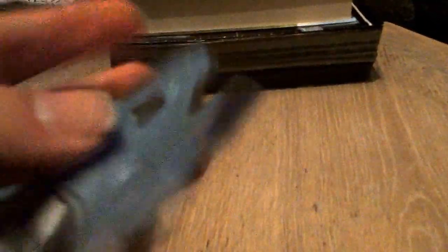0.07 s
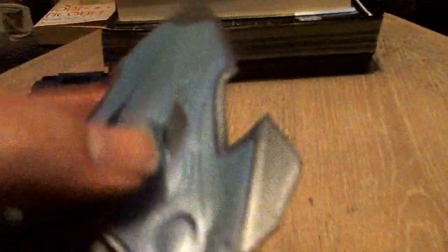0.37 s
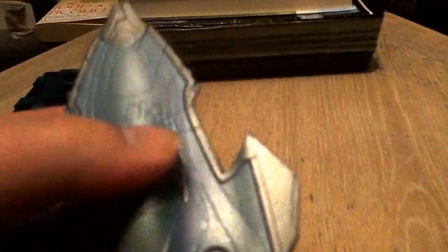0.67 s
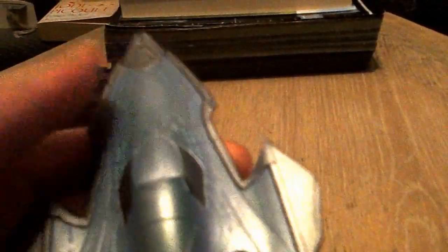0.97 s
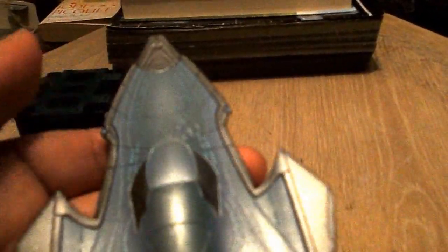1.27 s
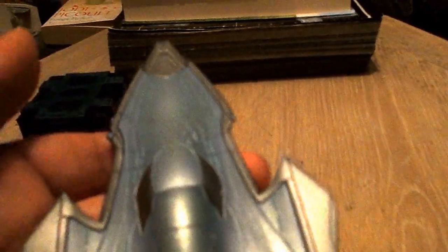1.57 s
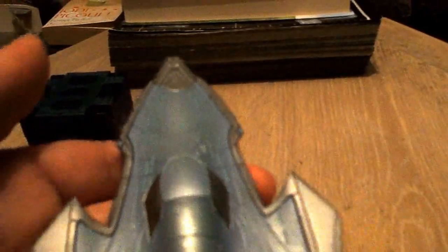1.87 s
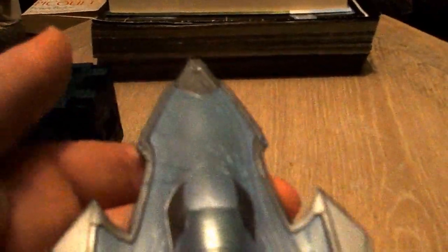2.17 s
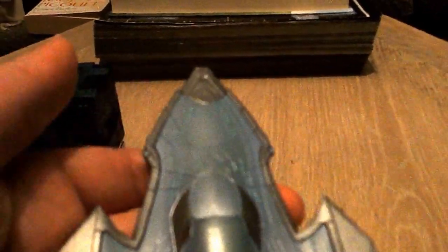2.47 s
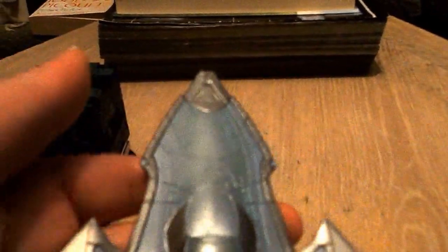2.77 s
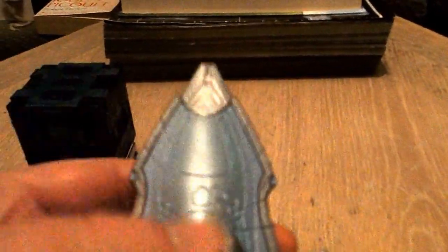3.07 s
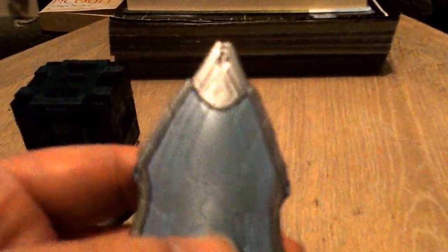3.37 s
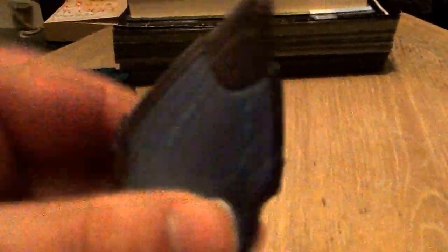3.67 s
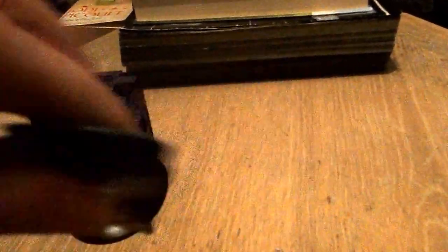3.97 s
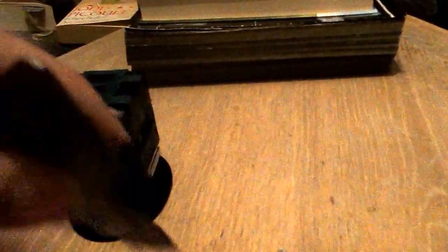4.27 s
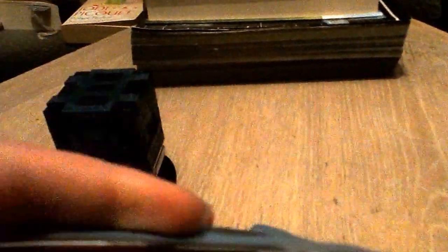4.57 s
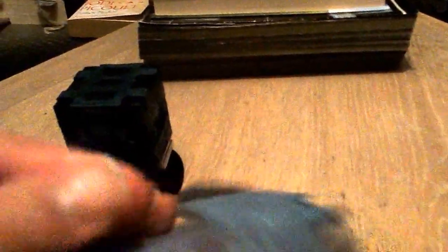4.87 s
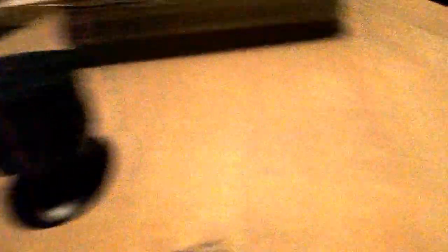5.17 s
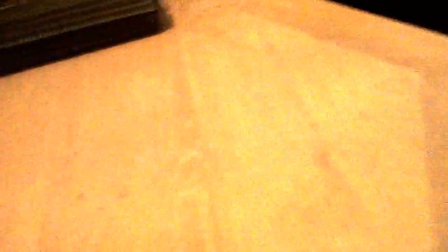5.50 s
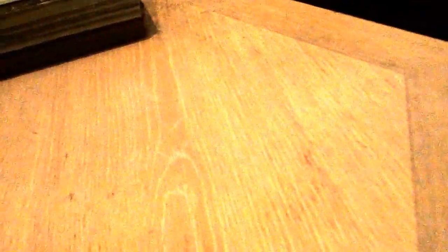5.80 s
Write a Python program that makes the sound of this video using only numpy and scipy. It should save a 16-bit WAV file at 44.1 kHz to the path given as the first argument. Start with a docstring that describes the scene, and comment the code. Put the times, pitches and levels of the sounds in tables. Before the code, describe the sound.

In a quiet room, a close microphone picks up the soft brushing of skin on a metal toy. A lull follows, then more rubbing and several light clicks against a plastic stand. Suddenly the toy falls and bounces rapidly on a wooden tabletop, each bright clack carrying a woody knock and a short ring, the loudest slightly clipped. It settles within a second, followed by faint low knocks.

```python
"""A die-cast metal model topples onto a wooden table and bounces to rest. Each impact excites the
normal modes of both bodies: a hard clack, a thud of the tabletop and a brief metallic ring.
Before the fall it is turned in the hand, where friction hisses over the casting, and is clicked
onto its plastic stand. A small, close microphone in a quiet room limits and clips the loudest blows."""
import sys
import numpy as np
from scipy import signal
from scipy.fft import rfft, irfft
from scipy.io import wavfile
from scipy.ndimage import uniform_filter1d

SR = 44100
rng = np.random.default_rng(int(sys.argv[2]) if len(sys.argv) > 2 else 0)


def transcribe(u):
    """Save the signal u as a 16-bit wav file named by the first command-line argument.

    u: samples, shape (n,) or (channels, n), limited to [-1, 1]; the rate is SR.
    q: integer samples, one column per channel.
    """
    v = np.clip(np.atleast_2d(u).T, -1, 1)
    q = np.round(v * 32767).astype(np.int16)
    wavfile.write(sys.argv[1], SR, q)


N = 266231
TIME = np.arange(N) / SR
AGE = TIME[:int(.7 * SR)]   # time since an impact, s

# impacts on the table: t/s, clack level/dB, clack f/Hz, thud level/dB
TABLE_IMPACTS = [(5.1002, -1, 2480, -2), (5.1502, 8.5, 5260, -10), (5.172, -20, 5840, -9),
                 (5.2105, -10, 6400, -14), (5.219, -14.5, 6200, -15), (5.2872, -10.5, 4700, -4.5),
                 (5.326, -9.5, 4650, -6.5), (5.3741, 0, 3870, -14), (5.3841, 8.5, 5300, -15),
                 (5.4198, 5.5, 4730, -13), (5.4432, -4.5, 5500, -24), (5.4745, 5.5, 3200, -14),
                 (5.526, -.5, 5330, -7), (5.5465, -6, 2940, -0.5), (5.5785, -16.5, 2560, -4),
                 (5.5995, -2.5, 6000, -11), (5.6226, -21, 2420, -.5), (5.641, -6, 2400, -3),
                 (5.6455, -2, 3400, -4.5), (5.6858, -4, 6000, -2), (5.836, -12, 3600, -16)]
# normal modes of the casting and of the tabletop: f/Hz, level/dB, relative decay time
CASTING_MODES = [(1748, -5, 1.2), (2435, 2, .9), (2660, -6, .8), (2995, -1, .8), (3160, -9, .7),
                 (3392, -2, .8), (3505, -6, .7), (3785, -10, .7), (4430, -4, .6), (4750, -5, .6),
                 (4960, -6, .6), (5280, -3, .9), (5540, -2, .6), (5750, -8, .5), (6016, -3, .8),
                 (6160, -6, .7), (6480, -4, .6), (6850, -8, .6), (7226, -4, .6), (8240, -9, .6),
                 (8670, -7, .7), (9400, -12, .5)]
TABLETOP_MODES = [(119, -13, 0.58), (168.6, -7, 1.1), (224.2, 0.5, 1.6), (246.7, -3, 1.2),
                  (288.4, -1, 0.81), (341, -14, .8), (379.5, -7.5, 1.47), (525, -1, 1.2),
                  (580.4, 4.5, 0.67), (629.5, -1, 0.54), (764, 2.5, 0.35), (795, -1.5, 0.43),
                  (1064, 1.5, 1.2), (1080, -2.5, 0.86), (1268, -12, 0.4)]
# spectrum of the knock on wood: f/Hz, spectral level/dB
KNOCK_SPECTRUM = [(100, -39), (200, -6), (560, 5), (1100, 1), (1500, -11), (2500, -4), (5000, -30)]
# the casting's ring, long while it tumbles, short once flat: t/s, T60/s, level/dB for a 0 dB blow
RING_DECAYS = [(5.1, 0.2, -12.5), (5.33, 0.19, -12.5), (5.41, .05, -25), (5.476, .09, -2), (5.58, .1, -9.5),
               (5.72, 0.098, -17.5), (5.84, .07, -8.5)]
# low ringing tones of the casting and tabletop: from t/s, until t/s, f/Hz, level/dB for a 0 dB blow
LOW_TONES = [(4.94, 5.046, 1762, -40), (5.05, 5.373, 1749, -24), (5.05, 5.308, 965, -31.5),
             (5.305, 5.565, 961, -14), (5.46, 5.746, 1734, -31), (5.52, 5.72, 1295, -27),
             (5.56, 5.77, 970, -17.5), (5.61, 5.765, 1140, -22)]
# the held model striking its stand: t/s, level/dB, f/Hz
STAND_IMPACTS = [(3.2023, -40, 3120), (3.219, -39.5, 3100), (4.0522, -11, 2960), (4.098, -28, 2940),
                 (4.4051, -5, 3250), (4.5320, -2, 3395), (4.9542, -18, 6240), (4.988, -7, 6470),
                 (5.003, -19.5, 6000)]
# finger strokes: start t/s, end t/s, level/dB, hiss f/Hz
STROKES = [(.006, 0.073, -41, 6000), (0.069, 0.179, -35.5, 9800), (0.181, .208, -44, 7000),
           (.27, 0.402, -55, 7100), (0.418, 0.506, -49.5, 7100), (0.494, .575, -40, 6960),
           (.55, .68, -42, 6940), (0.644, 0.786, -39, 6400), (0.771, 0.944, -43, 6200),
           (3.392, 3.526, -50, 4970), (3.547, 3.702, -52.5, 5670), (3.665, 3.75, -41, 5400),
           (3.7, 3.808, -37, 5900), (3.809, 3.875, -37, 6400), (3.948, 3.991, -42, 6500),
           (4.044, 4.133, -39.5, 7740), (4.405, 4.677, -44.5, 5500), (4.462, 4.579, -35.5, 6500),
           (4.688, 4.711, -42.5, 6300), (4.753, 4.808, -33.5, 6550), (4.849, 4.96, -36.5, 5600),
           (4.921, 5.028, -32, 6700)]
# skin sliding on metal: f/Hz, spectral level/dB
FRICTION_SPECTRUM = [(710, -71), (1200, -17), (1720, -5.5), (1960, -33), (2430, -9), (3330, -8.5),
                     (4080, -10), (4520, -8.5), (5490, -9.5), (6310, -4.5), (7590, -5), (9750, -5),
                     (11000, -14), (14300, -59), (22000, -120)]
# soft bumps and ticks of handling, then low knocks of the table after the fall: t/s, level/dB, f/Hz, T60/s
SOFT_IMPACTS = [(1.493, -43.5, 2500, 0.013), (2.926, -50.5, 350, 0.12), (3.457, -45, 242, .21),
                (3.464, -53, 832, 0.63), (5.893, -33.5, 407, 0.26), (6.017, -34, 573, .24),
                (6.034, -43, 1200, .11)]
# hollow resonances dying away at the start: f/Hz, level/dB
HOLLOW_RESONANCES = [(250, -59), (518, -50.5), (874, -54), (1642, -51.5)]
# reverberation time of the room: f/Hz, T60/s
REVERBERATION = [(100, 0.56), (400, 0.58), (2000, 0.32), (6000, 0.32), (11000, 0.29)]
# room tone and hiss: f/Hz, spectral level/dB
BACKGROUND_SPECTRUM = [(15, -54), (25, -24.5), (169, -4.5), (241, -2), (336, -4), (372, -5), (468, -4.5),
                       (603, -8.5), (651, -8), (1760, -12), (5390, -13), (7700, -11.5), (8530, -10.5),
                       (11000, -15.5), (14300, -78), (22000, -120)]


def fall(ring_db_per_db=.52, ring_pitch_ratio=1.2, top_hz=9500):
    """Impact excitation: each bounce clacks, thumps the board and leaves the casting ringing."""
    out = np.zeros(N)
    times, t60s, levels = np.transpose(RING_DECAYS)
    for s, clack_db, hz, thud_db in contacts():
        strike = clack(hz, width_hz=4300, t60=.028, bright_db=-27, low_hz=1430,
                       metal_db=-1.5, metal_t60=.06, focus_db=7)
        add(out, s, from_db(clack_db) * strike)
        add(out, s, from_db(thud_db) * thud())
        ring_db = np.interp(s, times, levels) + ring_db_per_db * blow_db(clack_db, thud_db)
        after_ring = ring(CASTING_MODES, np.interp(s, times, t60s), ring_pitch_ratio * hz, focus_db=6)
        add(out, s, from_db(ring_db) * after_ring)
    return cut(out, top_hz, "low")


def contacts(settle_s=5.7085, gap_s=.0108, count=5, loss_db=.65, clack_db=-24.5, hz=2900, thud_db=-12.5):
    """Inelastic collisions: the bounces, plus a run of ever weaker contacts as the model rocks to rest."""
    rocking = [(settle_s + k * gap_s, clack_db - k * loss_db, hz, thud_db - k * loss_db)
               for k in range(count)]
    return TABLE_IMPACTS + rocking


def blow_db(clack_db, thud_db):
    """Incoherent addition: the powers of clack and thud sum to the level of the blow."""
    return 20 * np.log10(np.hypot(from_db(clack_db), from_db(thud_db)))


def clack(hz, width_hz, t60, bright_db, low_hz, metal_db, metal_t60, focus_db):
    """A brief contact has a broad spectrum: a crack, and a clink of modes damped by the contact."""
    white = rng.standard_normal(len(AGE))
    band = resonate(white, hz, width_hz) + from_db(bright_db) * white
    crack = burst(cut(band, low_hz, "high"), fade(t60))
    clink = ring(CASTING_MODES, metal_t60, hz, focus_db)
    return (crack + from_db(metal_db) * clink) / np.hypot(1, from_db(metal_db))


def ring(modes, t60, favoured_hz, focus_db):
    """Modal superposition: damped sines, weighted by -focus_db per octave away from favoured_hz."""
    hz, db, decay_ratios = np.transpose(modes)
    scatter_db = 4.5 * rng.standard_normal(len(hz))
    octaves_away = np.abs(np.log2(hz / favoured_hz))
    gains = from_db(db + scatter_db - focus_db * octaves_away) * rng.choice([-1, 1], len(hz))
    gains = gains / np.linalg.norm(gains)
    hz = hz * (1 + .002 * rng.standard_normal(len(hz)))   # each contact loads the body differently
    return sum(gain * np.sin(2 * np.pi * f * AGE) * fade(t60 * ratio)
               for gain, f, ratio in zip(gains, hz, decay_ratios))


def thud(knock_t60=.023, board_db=-9, board_t60=.2, low_hz=135):
    """A struck plate: the wood gives a dull knock, then vibrates freely in its modes."""
    knock = burst(noise(KNOCK_SPECTRUM, len(AGE)), fade(knock_t60))
    board = ring(TABLETOP_MODES, board_t60, favoured_hz=600, focus_db=3)
    return cut(knock + from_db(board_db) * board, low_hz, "high", order=4)


def low_ringing(db_per_db=.27, detune_share=.014):
    """Free vibration: each contact restarts low tones of the casting and tabletop, slightly detuned."""
    blows = [(s, db) for s, db, _ in STAND_IMPACTS]
    blows += [(s, blow_db(clack_db, thud_db)) for s, clack_db, _, thud_db in contacts()]
    blows.sort()
    gaps = np.diff([s for s, _ in blows], append=N / SR)
    detunes = 1 + detune_share * rng.uniform(-.89, 1, len(blows))
    out = np.zeros(N)
    for start, until, hz, level_db in LOW_TONES:
        for (s, db), gap_s, detune in zip(blows, gaps, detunes):
            if start <= s < until:
                tone = stopped_tone(hz * detune, min(gap_s, until - s))
                add(out, s, from_db(level_db + db_per_db * db) * tone)
    return out


def stopped_tone(hz, free_s, t60=.59, damp_s=.0036):
    """Contact damping: one mode decays freely for free_s, then is quickly stopped."""
    gate = np.clip(1 + (free_s - AGE) / damp_s, 0, 1)
    return np.sin(2 * np.pi * hz * AGE) * fade(t60) * gate


def stand_clicks(peg_db=-7, ring_db=-23, db_per_db=.56, stand_db=-19.5, stand_hz=1050, grip_hz=2400):
    """An impact excites both bodies: metal ticks and rings, the peg pings, the hollow stand knocks."""
    metal, plastic = np.zeros((2, N))
    for s, db, hz in STAND_IMPACTS:
        tick = clack(hz, width_hz=560, t60=.008, bright_db=-10, low_hz=1420,
                     metal_db=-5.5, metal_t60=.034, focus_db=-4.5)
        ping = np.sin(2 * np.pi * hz * AGE) * fade(t60=.028)
        add(metal, s, from_db(db) * (tick + from_db(peg_db) * ping))
        drive_db = db_per_db * db
        held_ring = ring(CASTING_MODES, t60=.13, favoured_hz=hz, focus_db=.5)
        add(metal, s, from_db(ring_db + drive_db) * held_ring)
        knock_db = stand_db + drive_db - 9 * np.log2(hz / stand_hz)   # higher clicks excite it less
        add(plastic, s, from_db(knock_db) * dull_ring(stand_hz, width_hz=330, t60=.052))
    return cut(metal, grip_hz, "high", order=4) + plastic   # the grip damps the low modes


def fingers(grain_db=1, modes_db=-6, peak_db=-5.5, skew=.92, roundness=.76, edge_share=.24):
    """Sliding friction: skin slips over the metal in tiny grains, which hiss and excite its modes."""
    grains = from_db(grain_db * rms_one(uniform_filter1d(rng.standard_normal(N), size=90)))
    friction = noise(FRICTION_SPECTRUM, N) * grains
    body = sum(from_db(db) * resonate(friction, hz, width_hz=70) for hz, db, _ in CASTING_MODES)
    friction = friction + from_db(modes_db) * rms_one(body)
    friction = cut(friction, 2070, "high", order=3)   # the grip damps the low modes
    out = np.zeros(N)
    for start, end, db, hz in STROKES:
        progress = np.clip((TIME - start) / (end - start), 0, 1)
        pressure = np.abs(np.sin(np.pi * progress ** skew)) ** roundness   # one arch, cresting early
        hiss = cut(friction, edge_share * hz, "high")   # a higher stroke is also thinner
        peak = rms_one(resonate(hiss, hz, width_hz=1300))
        out += from_db(db) * pressure * rms_one(hiss + from_db(peak_db) * peak)
    return out


def squeak(at_s=.165, half_width_s=.018, hz=5160, db=-45.5):
    """Stick-slip motion: a fingertip sounds a narrow band for an instant."""
    swell = np.exp(-((TIME - at_s) / half_width_s) ** 2)
    return from_db(db) * swell * rms_one(resonate(rng.standard_normal(N), hz, width_hz=70))


def bumps(time_bandwidth=42):
    """Soft contacts excite one resonance each; its bandwidth varies inversely with its decay time."""
    out = np.zeros(N)
    for s, db, hz, t60 in SOFT_IMPACTS:
        add(out, s, from_db(db) * dull_ring(hz, time_bandwidth / t60, t60))
    return out


def hollow_ring(t60=1.0, width_share=.11):
    """Free decay: a few broad resonances, already sounding at the start, fade away."""
    out = np.zeros(N)
    for hz, db in HOLLOW_RESONANCES:
        add(out, 0, from_db(db) * dull_ring(hz, width_share * hz, t60))
    return out


def room(x, wet_db, build_s=.0022):
    """Reverberation: direct sound plus a diffuse tail whose treble is absorbed first."""
    edges_hz = np.geomspace(60, 12000, num=9)
    tail = np.zeros(len(AGE))
    for low, high in zip(edges_hz, edges_hz[1:]):
        bandpass = signal.butter(2, [low, high], "band", fs=SR, output="sos")
        band = signal.sosfilt(bandpass, rng.standard_normal(len(AGE)))
        tail += band * fade(at_hz(REVERBERATION, np.sqrt(low * high)))
    tail *= 1 - np.exp(-AGE / build_s)
    return x + from_db(wet_db) * signal.fftconvolve(x, tail / np.linalg.norm(tail))[:N]


def background(db=-56):
    """Stationary noise: room tone and hiss."""
    return from_db(db) * noise(BACKGROUND_SPECTRUM, N)


def dull_ring(hz, width_hz, t60):
    """A rough damped resonance: band noise under an exponential decay."""
    return burst(resonate(rng.standard_normal(len(AGE)), hz, width_hz), fade(t60))


def resonate(x, hz, width_hz):
    """A second-order resonator with unit peak gain."""
    r = np.exp(-np.pi * width_hz / SR)
    feedback = [1, -2 * r * np.cos(2 * np.pi * hz / SR), r * r]
    return signal.lfilter(np.array([1, 0, -1]) * (1 - r * r) / 2, feedback, x + 1e-18)


def cut(x, hz, kind, order=2):
    """A maximally flat high- or low-pass filter."""
    return signal.sosfilt(signal.butter(order, hz, kind, fs=SR, output="sos"), x)


def noise(spectrum, size):
    """Spectral shaping of white noise, scaled to rms 1."""
    gains = from_db(at_hz(spectrum, np.fft.rfftfreq(size, 1 / SR)))
    return rms_one(irfft(rfft(rng.standard_normal(size)) * gains, size))


def burst(carrier, envelope):
    """Amplitude modulation, scaled to the energy of the envelope."""
    return rms_one(carrier * envelope) * np.sqrt(np.mean(envelope ** 2))


def fade(t60):
    """Exponential decay of 60 dB in t60 seconds."""
    return np.exp(-np.log(1000) * AGE / t60)


def at_hz(points, hz):
    """Interpolation on a log-frequency axis."""
    frequencies, values = np.transpose(points)
    return np.interp(np.log(np.maximum(hz, 1)), np.log(frequencies), values)


def add(track, s, sound):
    """Superposition of a sound on the track at time s."""
    start = round(s * SR)
    track[start:start + len(sound)] += sound[:N - start]


def from_db(db):
    """Level to amplitude ratio."""
    return 10 ** (np.asarray(db) / 20)


def rms_one(x):
    """Normalisation to rms 1."""
    return x / np.sqrt(np.mean(x ** 2) + 1e-20)


def limiter(x, threshold_db=-3.5, release_db_per_s=170, attack_s=.0031):
    """Dynamic compression: the gain drops under each loud blow and recovers at a steady rate."""
    over_db = np.maximum(20 * np.log10(np.abs(x) + 1e-9) - threshold_db, 0)
    release_db = release_db_per_s * TIME
    held_db = np.maximum.accumulate(over_db + release_db, axis=-1) - release_db
    r = np.exp(-1 / (attack_s * SR))
    return x * from_db(-signal.lfilter([1 - r], [1, -r], held_db))


def scene():
    """The direct-to-reverberant ratio conveys distance: handling close by, the fall farther off."""
    near = room(fingers() + squeak() + stand_clicks() + bumps() + hollow_ring(), wet_db=-22.5)
    farther = room(fall() + low_ringing(), wet_db=-14.5)
    return (near + farther + background())[None]


def record(dry, notch_hz=7690, notch_width_hz=520, ceiling=.68, band_hz=11100, stop_hz=17600):
    """Overload: a band-limited microphone with a treble notch limits and clips the peaks."""
    limited = limiter(dry - resonate(dry, notch_hz, notch_width_hz))
    clipped = cut(np.clip(limited, -ceiling, ceiling), 60, "high")
    narrow = signal.sosfilt(signal.ellip(8, .5, 80, band_hz, fs=SR, output="sos"), clipped)
    lowpass = signal.cheby2(14, 70, stop_hz, fs=SR, output="sos")
    return signal.sosfilt(lowpass, np.clip(narrow, -ceiling, ceiling))


dry = scene()
out = record(dry)
transcribe(out)
```